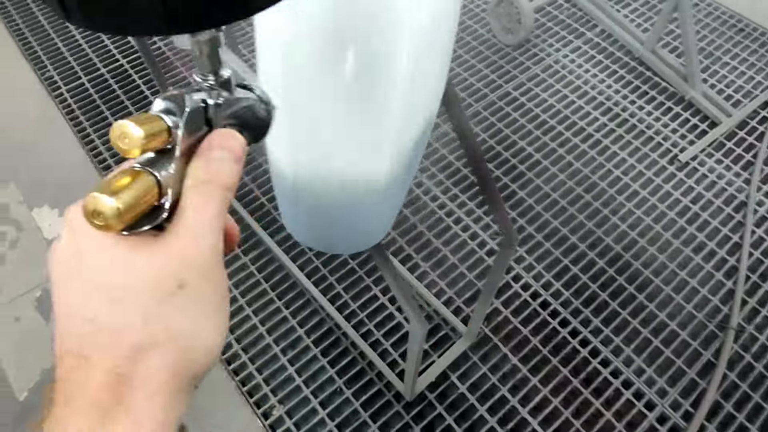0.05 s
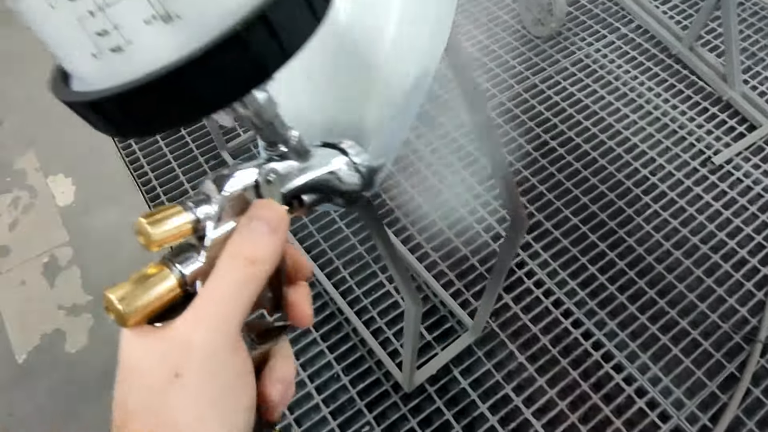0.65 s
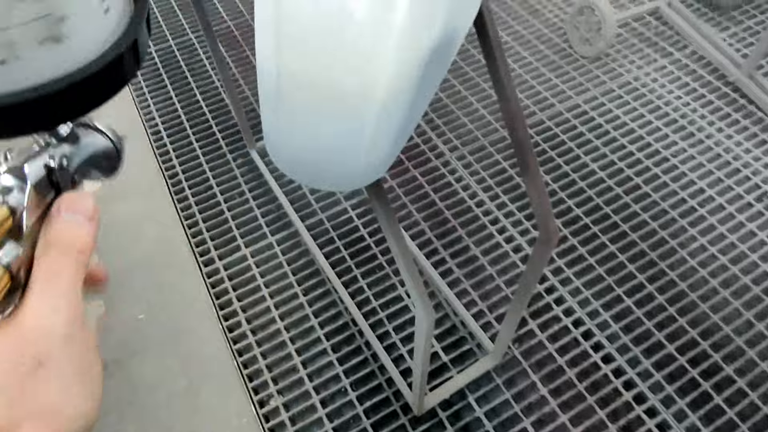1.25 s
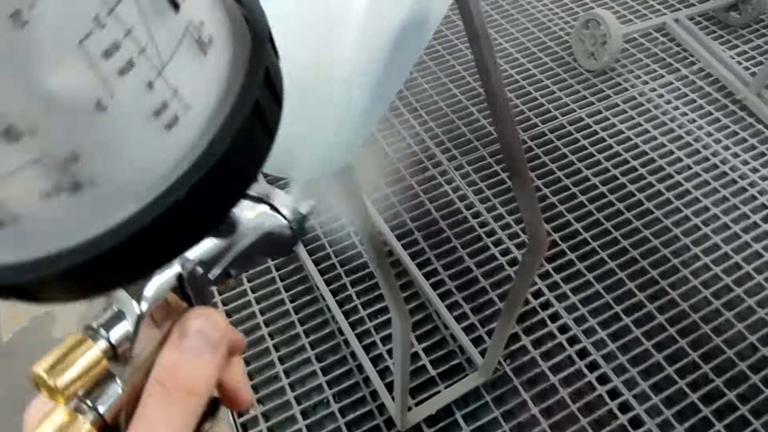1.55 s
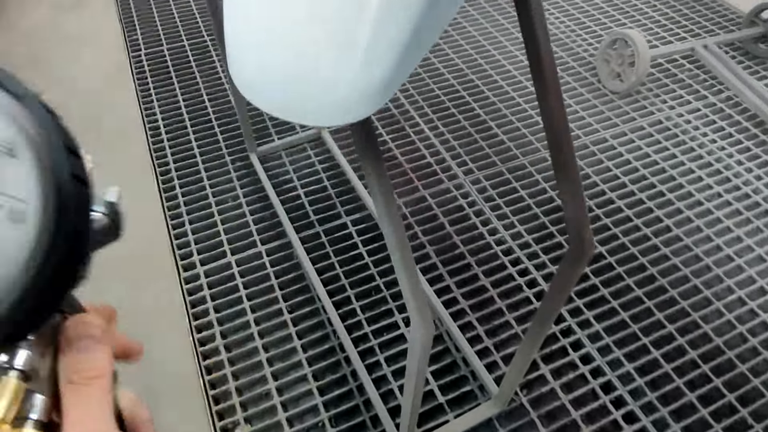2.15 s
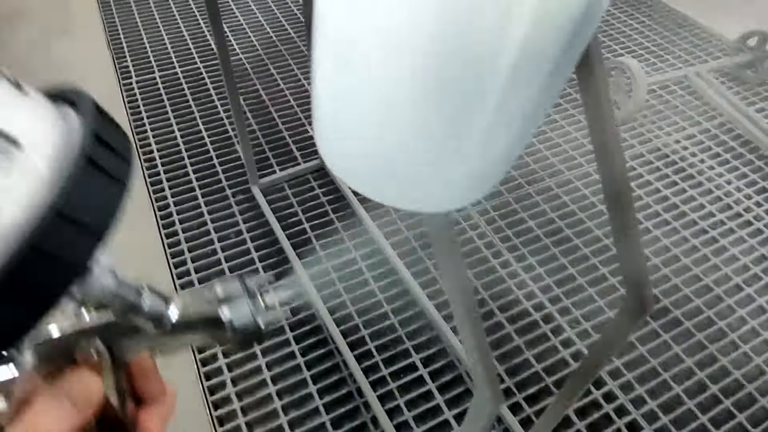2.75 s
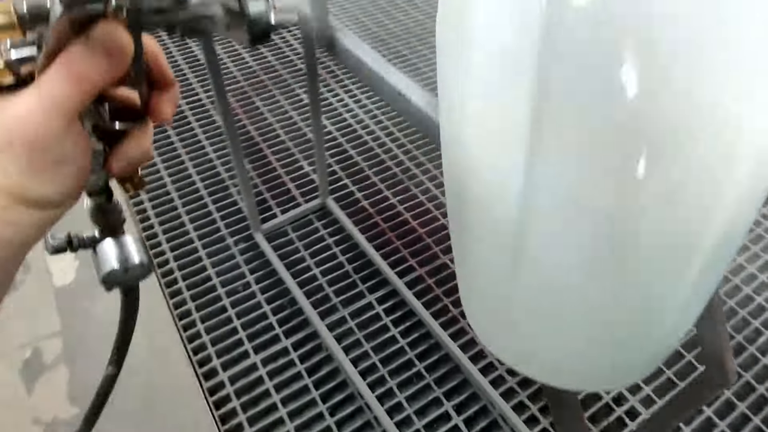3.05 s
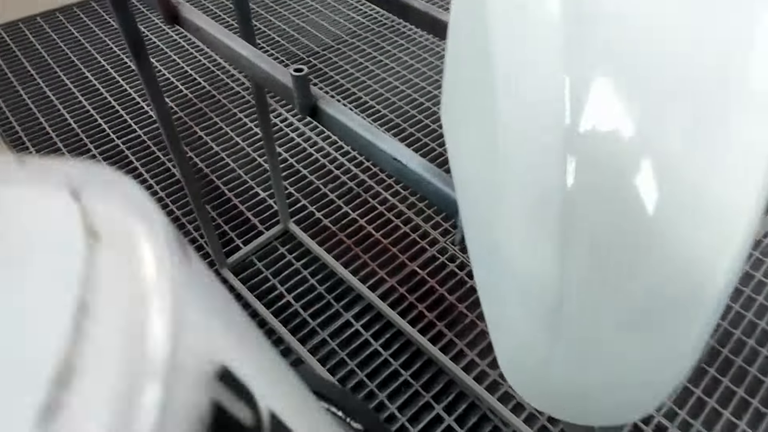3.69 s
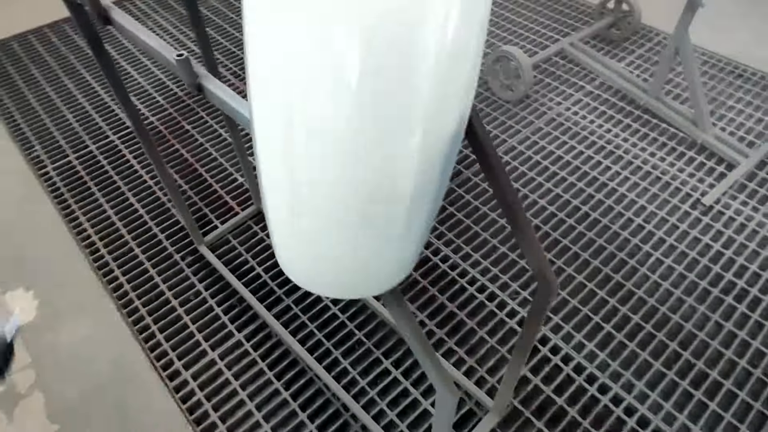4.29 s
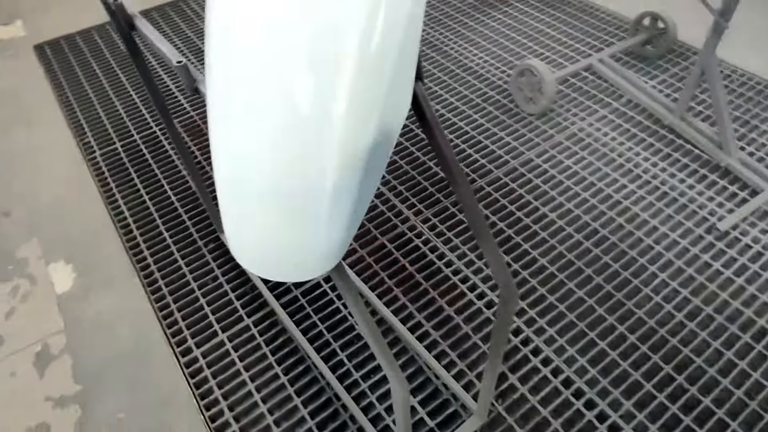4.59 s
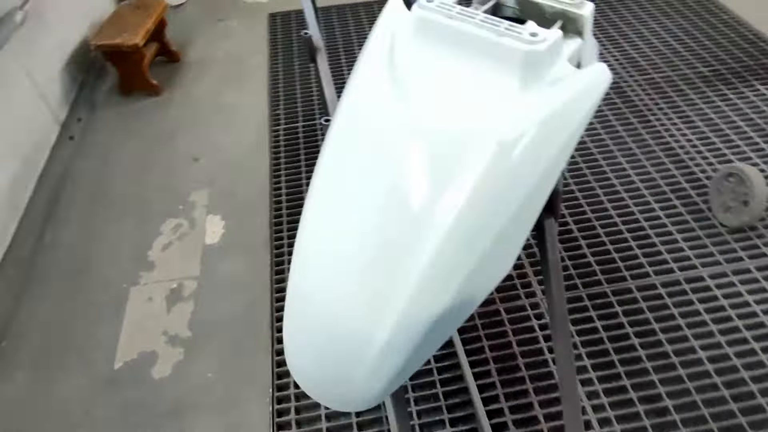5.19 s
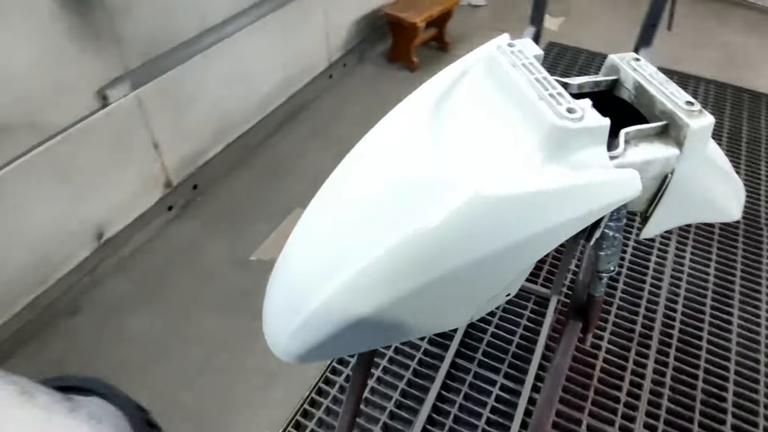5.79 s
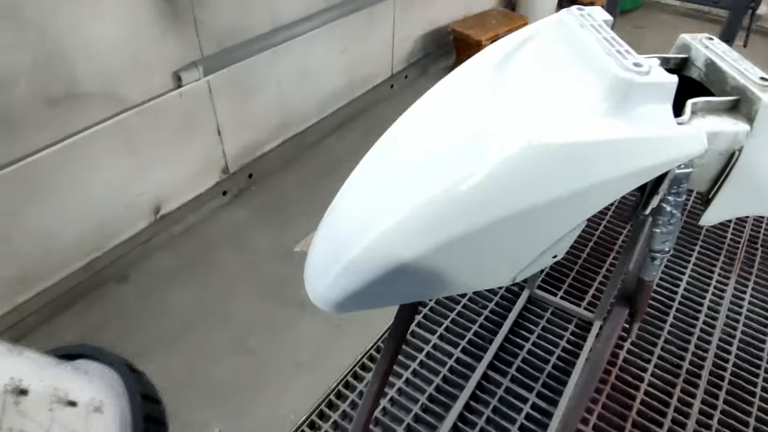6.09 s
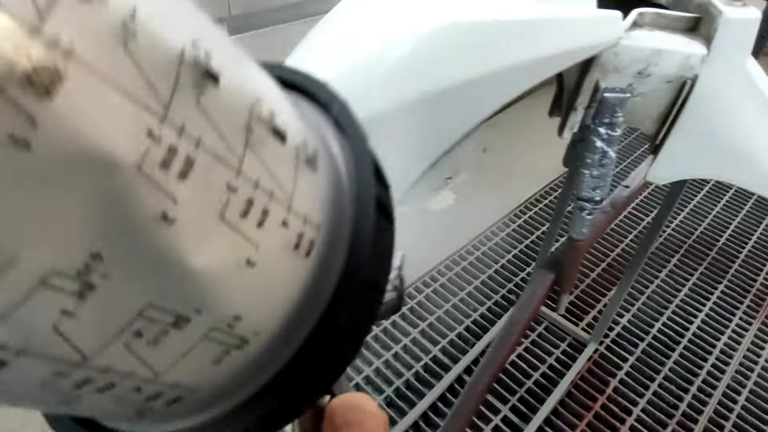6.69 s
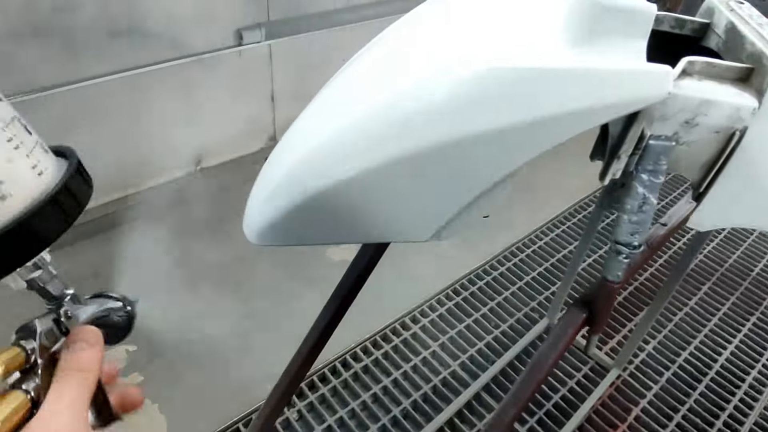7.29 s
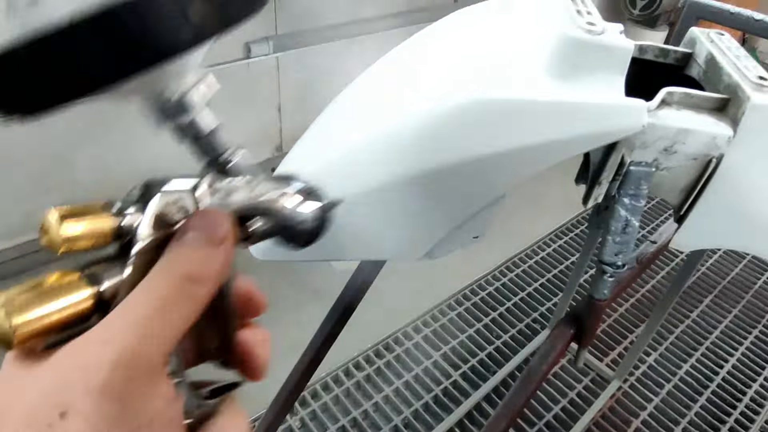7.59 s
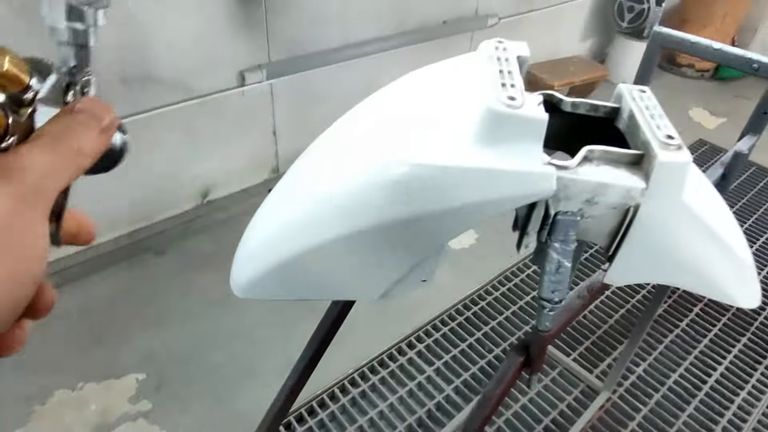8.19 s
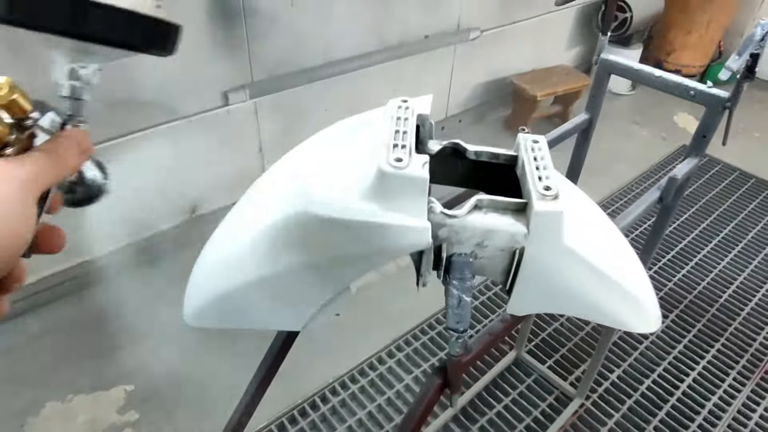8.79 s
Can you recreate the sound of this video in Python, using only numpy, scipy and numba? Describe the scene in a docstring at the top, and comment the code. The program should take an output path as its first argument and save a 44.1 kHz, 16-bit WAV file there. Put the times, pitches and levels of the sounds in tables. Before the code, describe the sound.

A compressed-air spray gun hisses close to the microphone in a paint booth. Each trigger pull gives a tiny metallic clink and a puff, then a bright, rushing hiss that shifts in tone as the gun swings. Nine quick bursts run together, then spraying stops for about two seconds while the low fan hum and duct rumble swell. Six more bursts follow, pushing the ventilation into the background again.

```python
"""A compressed-air paint gun sprays a panel in short passes, close to a camera, in a booth with fans.
Each trigger pull clinks the valve and lets out a puff, then a turbulent hiss whose rings and near
echoes shift as the gun swings. Behind it two fans beat over duct rumble and the filter draught.
The camera's gain control holds the fans down under the hiss and lets them swell in the breaks."""
import sys
import numpy as np
from scipy import signal
from scipy.fft import rfft, irfft, next_fast_len
from scipy.io import wavfile
from scipy.ndimage import uniform_filter1d, map_coordinates
from numba import njit

SR = 44100
rng = np.random.default_rng(int(sys.argv[2]) if len(sys.argv) > 2 else 0)


def wav_record(signal):
    """Record a signal, one row per channel, as 16-bit PCM in the file named by sys.argv[1]."""
    frames = np.transpose(np.atleast_2d(signal))
    bounded = np.clip(frames, -1, 1)
    # unit amplitude maps onto the largest positive 16-bit level
    quanta = np.round(bounded * 32767).astype(np.int16)
    wavfile.write(sys.argv[1], SR, quanta)


N = 399105
TIME_S = np.arange(N) / SR


def amp(db):
    """Decibels to gain."""
    return 10 ** (np.asarray(db) / 20)


def unit_rms(x):
    """Scale to rms 1."""
    return x / np.sqrt(np.mean(x ** 2) + 1e-20)


def log_interp(points, hz):
    """Read (freq_hz, value) points on a log axis."""
    freq_hz, values = np.transpose(points)
    return np.interp(np.log(hz + 1), np.log(freq_hz + 1), values)


def curves(rows):
    """Per-sample curve for each column after time_s."""
    time_s, *columns = np.transpose(rows)
    return [np.interp(TIME_S, time_s, column) for column in columns]


def wobble(rate_hz):
    """Smooth curve through random knots."""
    knots = rng.standard_normal(int(N * rate_hz / SR) + 4)
    fine = np.arange(0, len(knots) - 1, 1 / 10)
    return np.interp(TIME_S * rate_hz, fine, map_coordinates(knots, [fine]))


def filtered(x, response):
    """Apply the gain response(hz)."""
    size = next_fast_len(N + SR // 2)
    return irfft(rfft(x, size) * response(np.fft.rfftfreq(size, 1 / SR)), size)[..., :N]


def noise(spectrum):
    """Coloured noise, rms 1."""
    return unit_rms(filtered(rng.standard_normal(N), lambda hz: amp(log_interp(spectrum, hz))))


def panned(balance_db):
    """Left and right gains; positive is left."""
    return amp(np.array([[.5], [-.5]]) * balance_db)


# Booth field at the two microphone ports: freq_hz, coherence
COHERENCE = [(60, 0.97), (290, 0.96), (640, 0.55), (1400, -0.02), (3000, -0.27)]
def diffuse(spectrum):
    """Noise from all around: alike at both ports in the bass, largely unrelated in the treble."""
    def mid_side_gains(hz):
        angle = np.arccos(np.clip(log_interp(COHERENCE, hz), -1, 1)) / 2
        return np.array([np.cos(angle), np.sin(angle)])
    mid, side = filtered(np.array([noise(spectrum), noise(spectrum)]), mid_side_gains)
    return np.array([mid + side, mid - side])


# Fan and duct tones: pitch_hz, level_db
FAN_TONES = [(185.5, -14), (286.5, -6), (292.7, 3), (587, -14.5), (1465, -16.5)]
DUCT_TONES = [(52, -49.5), (72, -54.5)]
# Air noise: freq_hz, density_db
DUCT_SPECTRUM = [(10, -36), (25, -14), (40, -1.5), (55, 0.5), (95, -2.5), (135, -4.5), (185, -0.5),
                 (230, -7), (300, 3), (345, -2), (450, -23), (700, -43), (1500, -81)]
DRAUGHT_SPECTRUM = [(200, -40), (450, -0.5), (800, 0), (1150, -1), (1650, -1.5), (3000, -4.5),
                    (4100, -11.5), (5000, -25), (6200, -27.5), (7500, -37.5), (16000, -60)]
# Levels at the camera: time_s, level_db
FAN_LEVELS = [(0, -46.5), (1.6, -46.5), (2.2, -67), (2.7, -45), (3.4, -49), (5.3, -51.5), (5.7, -43),
              (7.2, -43.5), (8.2, -45.5), (9.05, -38.5)]
DRAUGHT_LEVELS = [(0, -43.5), (2.1, -50), (2.7, -46), (3.5, -49.5), (4.25, -48.5), (4.7, -47), (5.8, -45.5),
                  (7.3, -44.5), (9.05, -44.5)]
def ventilation(duct_db=-42.5):
    """Two fans beat over the ducts' drone and rumble and the draught through the filters."""
    def unsteady():
        return amp(1.5 * wobble(8))

    def tones(rows):
        return sum(amp(db) * unsteady() * np.sin(2 * np.pi * hz * TIME_S + 1.1 * wobble(9))
                   for hz, db in rows)

    (fan_db,), (draught_db,) = curves(FAN_LEVELS), curves(DRAUGHT_LEVELS)
    rumble = amp(duct_db) * unsteady() * diffuse(DUCT_SPECTRUM)
    draught = amp(draught_db + 1.27 * wobble(8)) * diffuse(DRAUGHT_SPECTRUM)
    drone = tones(DUCT_TONES)
    fans = amp(fan_db) * unit_rms(tones(FAN_TONES)) * panned(-5.5)
    return rumble + draught + drone + fans


# Valve modes: pitch_ratio, level_db, t60_s
CLINK_MODES = [(1, -3, .028), (1.12, -9, .02), (1.56, -9, .03)]
def clink(t, pitch_hz, delay_s=.006):
    """The air valve rings briefly as it opens."""
    age_s = np.maximum(t - delay_s, 0)
    return sum(amp(db + rng.normal(0, 1) - 60 * age_s / t60_s)
               * np.sin(2 * np.pi * pitch_hz * ratio * age_s) for ratio, db, t60_s in CLINK_MODES)


# Puff noise: freq_hz, density_db
SPIT_SPECTRUM = [(300, -2.5), (900, -15.5), (1800, -8.5), (2800, -10), (4200, -1), (5000, -18), (6000, -9),
                 (7000, -21), (16000, -20)]
THUD_SPECTRUM = [(20, -20), (50, -16), (130, 4), (220, 5), (450, -2.5), (900, -10), (3000, -50)]
POP_SPECTRUM = [(150, -17), (450, -7), (650, 1.5), (900, -1), (1200, -1), (1600, -6), (3000, -4.5),
                (8000, -54)]
# Trigger pulls, one pass each: start_s, end_s, spit_db, thud_db, pop_db, gust_db, clink_db, clink_hz,
# puff_balance_db, hiss_db, rush_start_db, rush_mid_db, rush_end_db, jet_balance_db,
# ring_hz, ring_db, upper_ring_db, dip_db
PASSES = [(-.1, 0.331, -50, -60, -60, -60, -60, 3000, 0, -41, -39.5, -39, -39.5, .7, 2950, 7, 5, 7),
          (0.408, 0.861, -41, -41, -58, -46, -31, 2970, -7, -41.5, -41.5, -37, -39.5, 0.87, 2930, 5.7, 3, 5),
          (.915, 1.291, -34, -32, -38, -32, -30, 3140, 8, -44, -39.5, -38, -40, 1.3, 3250, 2.7, 3.5, 5),
          (1.35, 1.775, -45, -46, -36.5, -31, -28, 3830, 10, -43, -40.5, -37, -37, 2.4, 3210, 5.2, 5.5, 2),
          (1.834, 2.182, -30, -39, -36, -42, -24, 3010, 12, -46, -45, -42, -41.5, 3.6, 3220, 5.5, 9, 3),
          (2.246, 2.531, -36, -38, -36, -38, -29, 2850, 12.5, -49, -48.5, -43, -41, 2.8, 3170, 5.3, 9, -1),
          (2.744, 3.309, -30, -29.5, -25, -31, -29, 2880, 21.5, -41.5, -36.5, -37.5, -44.5, 5.6, 3060, 4.8, -0.5, -3.5),
          (3.367, 3.793, -43, -27.5, -34, -34, -20, 2520, 8.5, -45, -47, -38.5, -43.5, 2.7, 3180, 4.5, 6.5, 0),
          (3.887, 4.135, -28, -38, -42, -25, -45, 2920, 10.5, -43, -43, -37.5, -43, 2.7, 3120, 3.8, 6, 1),
          (6.395, 6.96, -35.5, -25.5, -29.5, -21, -17.5, 3010, 14.5, -40.5, -34, -35.5, -33.5, 2.7, 3440, 5.5, 5, 10),
          (7.031, 7.439, -28.5, -30.5, -28, -34, -15.5, 2660, 12, -43.5, -43, -37.5, -40, 5.1, 3280, 6, 9.5, 6),
          (7.5, 7.885, -34, -36, -57, -40, -35, 4340, -5, -41, -37.5, -34.5, -30.5, 4.6, 3500, 2.5, 1.5, 10),
          (7.971, 8.238, -27, -29, -30.5, -22, -22, 3360, 10, -45, -43, -42.5, -42.5, 3.2, 3300, 4.9, 11.5, 3),
          (8.314, 8.6, -38, -37.5, -43, -31, -30, 3500, 20, -43.5, -46, -38.5, -34.5, 3.5, 3420, 8.3, 4, 5),
          (8.693, 8.952, -27, -25, -32, -23, -21, 3140, 16.5, -45, -40.5, -38.5, -38.5, 3.7, 3130, 4.9, 6, 9)]
def puffs(gust_delay_s=.0092, gust_push_s=.0057):
    """The valve clinks; a slug of air spits from the cap, pops and thuds; its gust hits the camera."""
    def bump(peak_s):
        return (t / peak_s * np.exp(1 - t / peak_s)) ** 4

    t = np.arange(SR // 10) / SR
    gust_age = np.maximum(t - gust_delay_s, 0) / gust_push_s
    gust = gust_age * (gust_age - 2) * np.exp(-gust_age)
    spit, thud, pop, knock = np.zeros((4, 2, N + SR))
    for start_s, _, spit_db, thud_db, pop_db, gust_db, clink_db, clink_hz, balance_db, *_ in PASSES:
        span = int(start_s * SR) + np.arange(len(t))
        pan = panned(balance_db)
        spit[:, span] += amp(spit_db) * pan * bump(peak_s=.0068)
        thud[:, span] += amp(thud_db) * pan * bump(peak_s=.0098)
        pop[:, span] += amp(pop_db) * pan * bump(peak_s=.01)
        knock[:, span] += pan * (amp(gust_db) * gust + amp(clink_db) * clink(t, clink_hz))
    return (spit[:, :N] * diffuse(SPIT_SPECTRUM) + thud[:, :N] * diffuse(THUD_SPECTRUM)
            + pop[:, :N] * diffuse(POP_SPECTRUM) + knock[:, :N])


def valve(rise_s, fall_s, surge_db, surge_s, bleed_db, bleed_s=.072):
    """Air flow: stored hose pressure surges at each pull; a little air bleeds on after release."""
    flow = np.zeros(N)
    for start_s, end_s, *_ in PASSES:
        span = np.arange(max(int(start_s * SR) - SR // 20, 0), min(int(end_s * SR) + SR // 2, N))
        t = span / SR
        opening = (1 + np.tanh((t - start_s) / rise_s)) / 2
        surge = amp(surge_db * np.exp(-np.maximum(t - start_s, 0) / surge_s))
        shut_s = np.maximum(t - end_s, 0)
        closing = np.maximum(np.exp(-shut_s / fall_s), amp(bleed_db) * np.exp(-shut_s / bleed_s))
        flow[span] += opening * surge * closing
    return flow


def arm_swing(hiss_follow=.76, arc_left_db=3):
    """One swing a pass: the jet swells and fades, arcs left mid-pass and has its own rings."""
    progress = np.linspace(0, 1, 9)
    arc_db = arc_left_db * (np.sin(np.pi * progress) - 2 / np.pi)
    path = []
    for row in PASSES:
        start_s, end_s = row[:2]
        hiss_db, first_db, mid_db, last_db, balance_db, *rings = row[9:17]
        time_s = start_s + (end_s - start_s) * progress
        rush_db = np.interp(progress, [0, .5, 1], [first_db, mid_db, last_db])
        swing_db = hiss_follow * (rush_db - rush_db.mean())
        held_rings = np.tile(rings, (len(progress), 1))
        path.append(np.column_stack([time_s, hiss_db + swing_db, rush_db, balance_db + arc_db, held_rings]))
    return curves(np.vstack(path))


def bell(hz, centre_hz, half_width_hz):
    """Peak of height 1."""
    return 1 / (1 + ((hz - centre_hz) / half_width_hz) ** 2)


def treble_dip(x, centre_hz=5070, half_width_hz=210):
    """A notch whose depth depends on how the gun is held in each pass."""
    hz, t, bins = signal.stft(x, SR, nperseg=256)
    depths = [(time_s, dip_db) for start_s, end_s, *_, dip_db in PASSES for time_s in (start_s, end_s)]
    depth_db = np.interp(t, *np.transpose(depths))
    notch = amp(-depth_db * bell(hz[:, None], centre_hz, half_width_hz))
    return signal.istft(bins * notch, SR, nperseg=256)[1][:, :N]


# Echoes off cup, hand and panel: delay_s, gain
NEAR_ECHOES = [(.0008, .42), (.0012, .52), (.0016, .52), (.0021, .42), (.003, .32), (.0046, .3),
               (.0068, .24)]
# Right port's lag as the gun moves across: time_s, lag_s
RIGHT_LAG = [(0, 0.00032), (.8, 0.0003), (1.5, 0.0003), (2, 0.00031), (2.5, 0.00029), (2.9, 0.00025),
             (3.5, 0.00032), (3.8, 0.00026), (4.1, 0.00032), (6.4, 0.00019), (6.85, 0.00021),
             (7.2, 0.00017), (7.8, 0.00019), (8.05, 0.0002), (8.4, 0.00013), (8.55, 0.0002), (9, 0.0002)]
def gun_motion(x, rush_db, ring_hz, ring_db, upper_db, upper_hz=4120, wander_hz=70,
               usual_rush_db=-40, focus=.45, echo_swing_s=.0001, port_swing_s=.00003):
    """The moving gun: two hollow rings wander, near echoes comb the hiss, the port lag shifts."""
    def drift(rate_hz):
        return map_coordinates(rng.standard_normal(int(t[-1] * rate_hz) + 4), [t * rate_hz])

    def ring(db, centre_hz, half_width_hz):
        return (db + focus_db) * bell(hz, centre_hz + wander_hz * drift(7), half_width_hz)

    hz, t, bins = signal.stft(x, SR, nperseg=1024)
    hz = hz[:, None]
    rush_db, ring_hz, ring_db, upper_db = (
        np.interp(t, TIME_S, curve) for curve in (rush_db, ring_hz, ring_db, upper_db))
    focus_db = focus * (rush_db - usual_rush_db)  # rings stand out as the jet swells
    rings_db = ring(ring_db, ring_hz, half_width_hz=207) + ring(upper_db, upper_hz, half_width_hz=224)
    paths = np.ones(bins.shape, complex)
    for delay_s, gain in NEAR_ECHOES:
        arrival_s = delay_s + echo_swing_s * drift(4) + port_swing_s * np.array([[drift(4)] for _ in x])
        fade = np.tanh(2 * drift(8))
        paths += gain * fade * np.exp(-2j * np.pi * hz * arrival_s)
    paths /= np.sqrt(np.mean(np.abs(paths) ** 2, axis=1, keepdims=True))
    paths[1] *= np.exp(-2j * np.pi * hz * np.interp(t, *np.transpose(RIGHT_LAG)))
    return signal.istft(bins * amp(rings_db - focus_db / 2) * paths, SR, nperseg=1024)[1][:, :N]


def booth_noise(envelope, spectrum, linger_s, wall_share=.3):
    """Jet noise: the direct part is the same at both ports, the walls' part lingers."""
    pole = np.exp(-1 / (linger_s * SR))
    walls = np.sqrt(signal.lfilter([1 - pole], [1, -pole], envelope ** 2)) * diffuse(spectrum)
    direct = envelope * noise(spectrum)
    return np.sqrt(1 - wall_share) * direct + np.sqrt(wall_share) * walls


# Nozzle hiss and air rush: freq_hz, density_db
HISS_SPECTRUM = [(1500, -46), (3500, -28), (5000, -7.5), (6200, 0.5), (7500, -1.5), (11000, -5.5),
                 (16000, -1)]
RUSH_SPECTRUM = [(200, -14), (600, -9), (1100, -7), (1800, -2.5), (2400, 0.5), (3000, 0), (4300, -6),
                 (4950, -3.5), (6000, -6), (7000, -9.5), (16000, -42)]
def spray():
    """The nozzle hisses and the fan of air rushes; both flutter with the jet's turbulence."""
    hiss_db, rush_db, balance_db, *rings = arm_swing()
    flutter = amp(.8 * wobble(45))
    hiss_flow = valve(rise_s=.002, fall_s=.0067, surge_db=10, surge_s=.042, bleed_db=-39)
    rush_flow = valve(rise_s=.0035, fall_s=.006, surge_db=7, surge_s=.034, bleed_db=-6)
    hiss = booth_noise(amp(hiss_db) * flutter * hiss_flow, HISS_SPECTRUM, linger_s=.023)
    rush = booth_noise(amp(rush_db) * flutter * rush_flow, RUSH_SPECTRUM, linger_s=.012)
    return panned(balance_db) * gun_motion(hiss + rush, rush_db, *rings)


def scene():
    """The gun in front of the ventilation."""
    return treble_dip(spray() + puffs()) + ventilation()


@njit
def follow(target, attack_s, release_s):
    """One-pole follower: attack going down, release going up."""
    out, now = np.empty_like(target), 0.
    for i in range(len(target)):
        now += (target[i] - now) / (SR * (attack_s if target[i] < now else release_s))
        out[i] = now
    return out


def gain_control(x, knee_db=-40, max_boost_db=16.5, limit_db=-20.5):
    """Gain creeps up while the treble is quiet and drops when it is loud; strong puffs push it lower."""
    def level_db(band):
        power = uniform_filter1d(np.mean(band ** 2, 0), size=128)
        return 10 * np.log10(np.abs(power) + 1e-12)

    treble = signal.sosfilt(signal.butter(4, 6000, "high", fs=SR, output="sos"), x)
    boost_db = np.clip(knee_db - level_db(treble), 0, max_boost_db)
    target_db = np.minimum(boost_db, limit_db - level_db(x))
    return x * amp(follow(target_db, attack_s=.006, release_s=.38))


# Camera housing and microphone port responses: freq_hz, gain_db
HOUSING_EQ = [(680, -0.5), (860, 3), (1130, -3.5), (1500, -0.5), (4250, -1.5), (4600, 0.5), (5000, 0),
              (5600, -1.5), (6000, 0.6), (6700, -4), (7000, 1), (7500, -2), (8000, -0.53)]
LEFT_EQ = [(750, 0), (1100, -2), (1700, -0.5), (3000, -0.6), (4200, 0), (5000, -1), (6200, 0.5), (7500, -4),
           (8150, 7.5), (8700, 2.5), (9600, 6.5), (10600, 4), (12500, -7), (13300, 7.5), (15600, 1.5)]
RIGHT_EQ = [(750, 0), (2400, 2.5), (3200, 6.5), (5000, 6.5), (6100, 8.5), (6700, 3), (8900, -10),
            (9800, 8.5), (10500, 0), (11000, 13), (12000, 7), (12700, -8), (13200, 9.5), (15200, -17)]
def record(dry):
    """Housing and ports colour the sound; then gain control and band limit."""
    def response(hz):
        ports_db = np.array([log_interp(LEFT_EQ, hz), log_interp(RIGHT_EQ, hz)])
        return amp(log_interp(HOUSING_EQ, hz) + ports_db)
    levelled = gain_control(filtered(dry, response))
    return filtered(levelled, lambda hz: hz < 15900)


dry = scene()
out = record(dry)
wav_record(out)
```